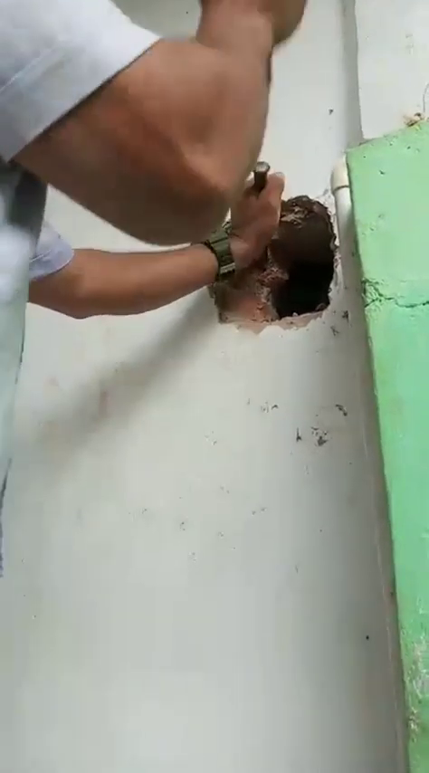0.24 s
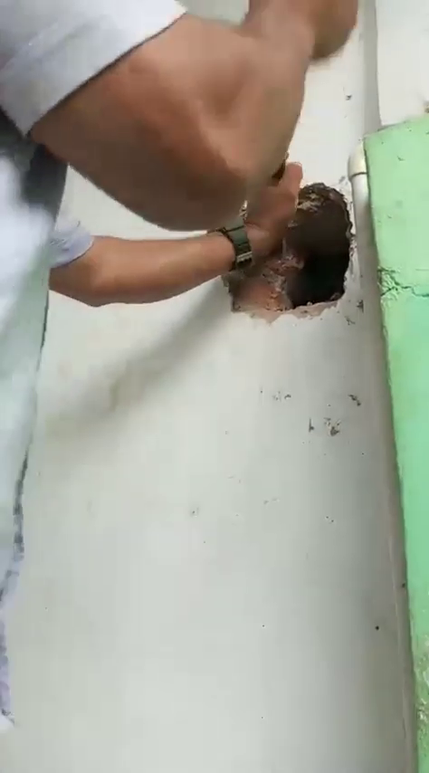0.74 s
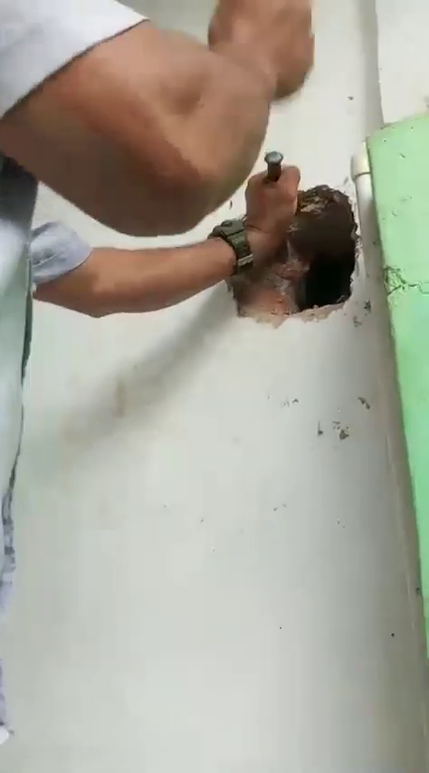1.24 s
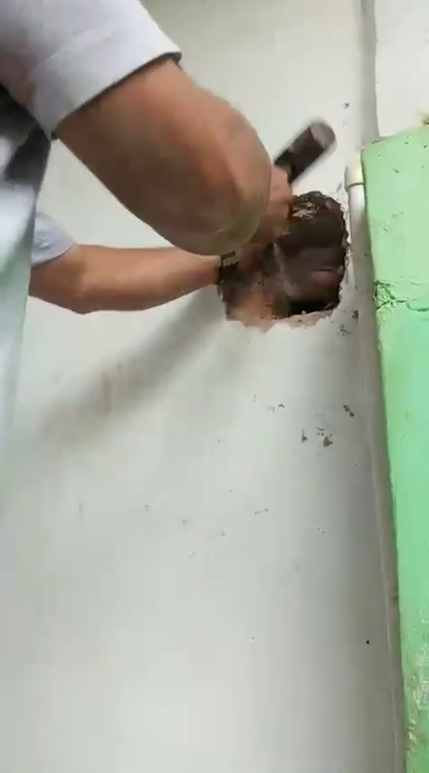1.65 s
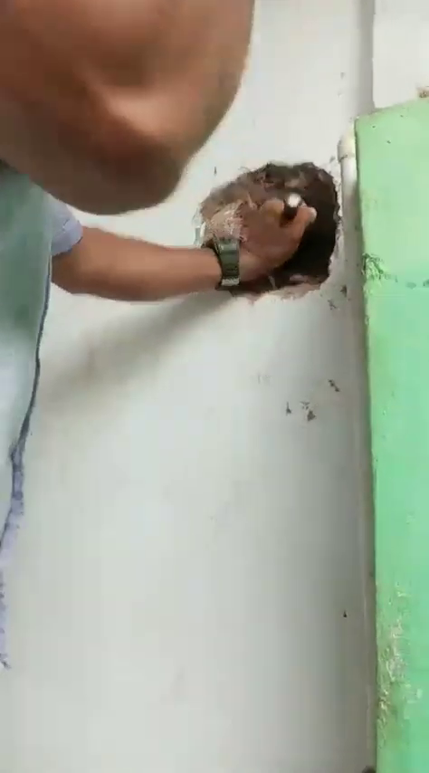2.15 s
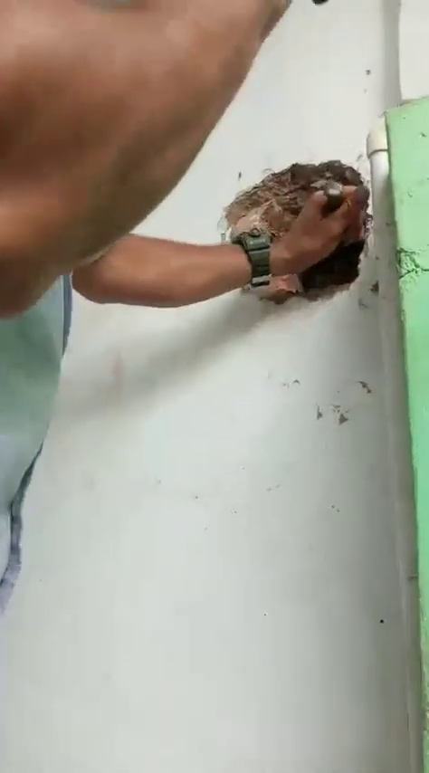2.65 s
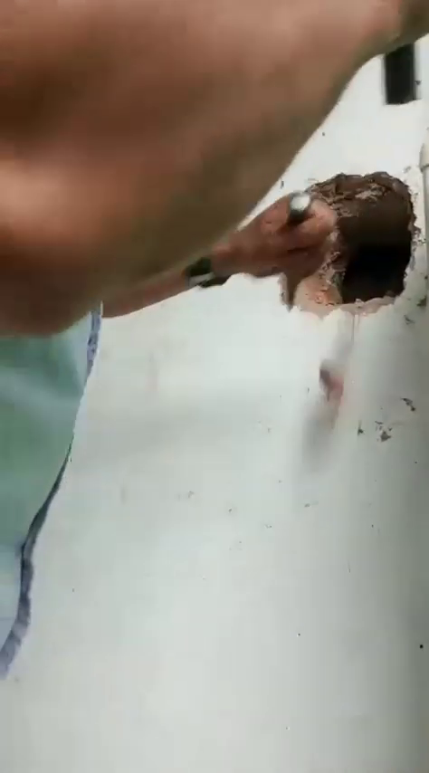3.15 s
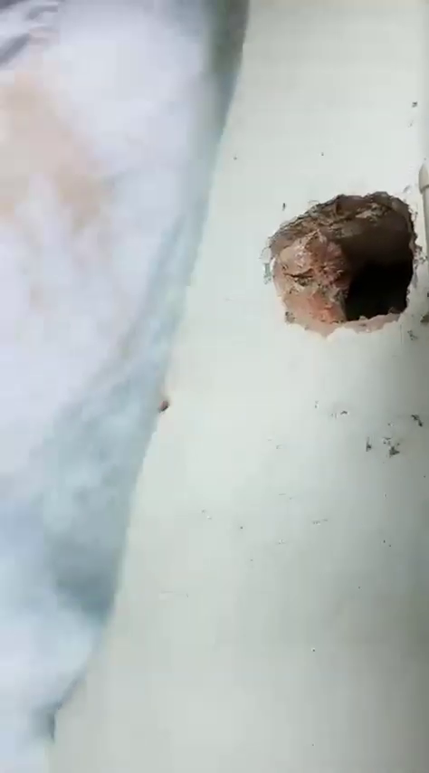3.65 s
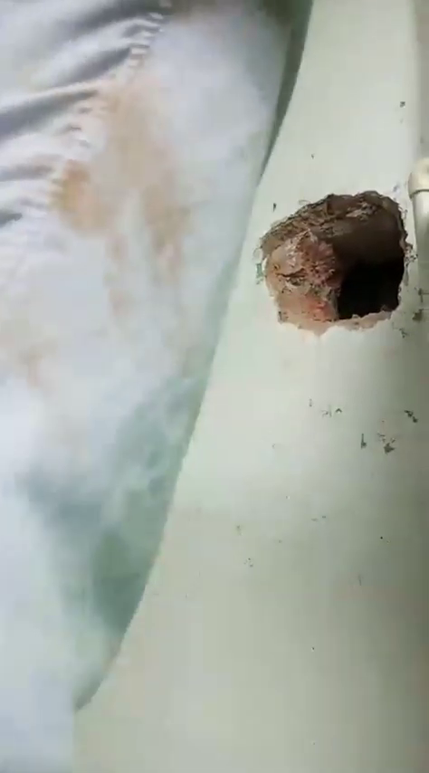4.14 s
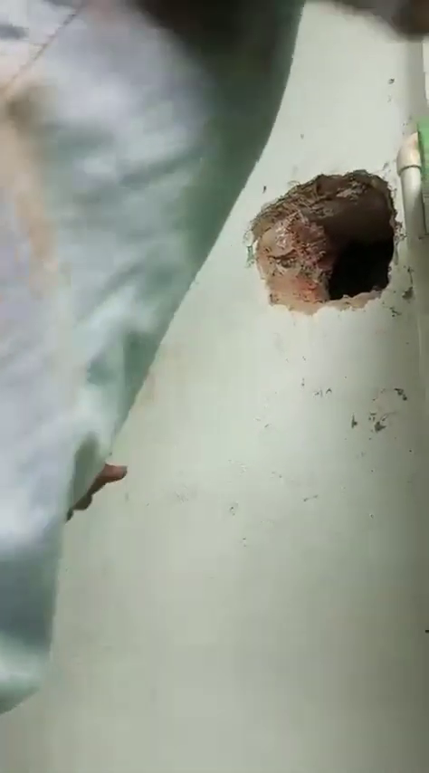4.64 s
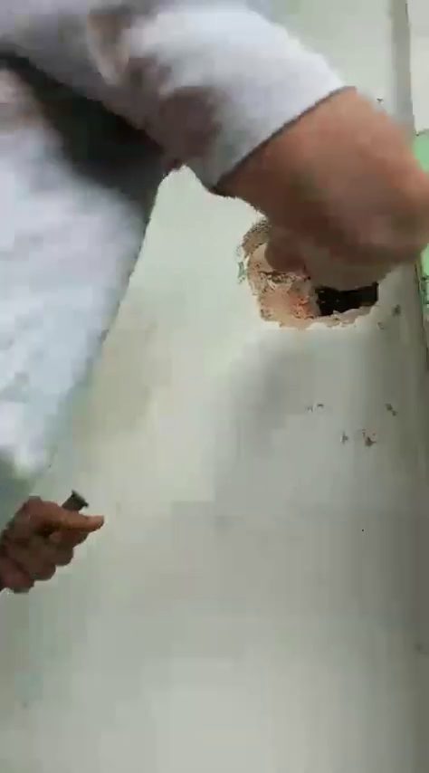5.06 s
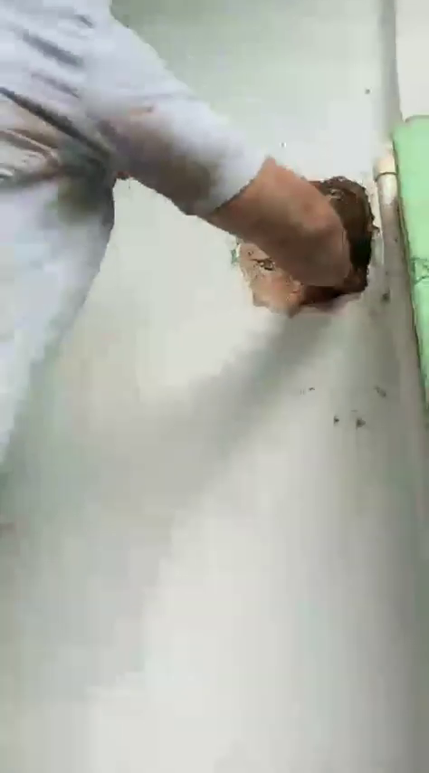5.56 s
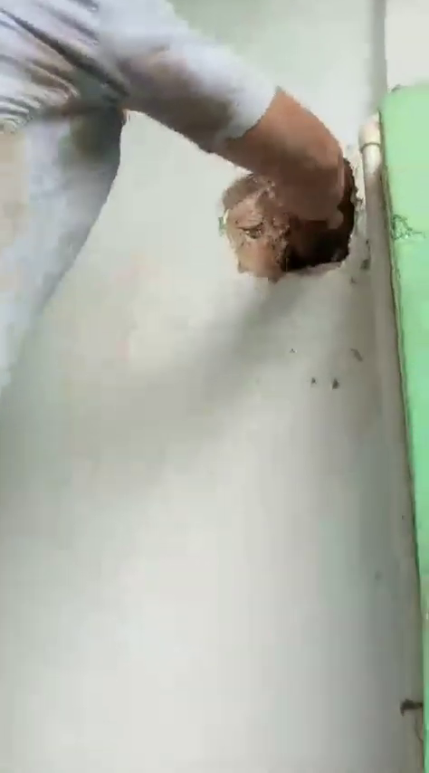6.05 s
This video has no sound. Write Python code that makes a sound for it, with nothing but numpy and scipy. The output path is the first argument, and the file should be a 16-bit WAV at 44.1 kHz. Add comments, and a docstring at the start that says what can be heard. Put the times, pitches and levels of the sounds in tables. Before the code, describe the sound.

Four hard hammer blows on a steel chisel crack into a brick wall, then chips patter, a shard clacks down, and faint scraping follows.

```python
"""A hammer drives a steel chisel into a plastered brick wall four times, in a small hard room: steel cracks, wall booms.
Resonant noise makes the crunch, falling chips, a larger shard and dull knocks; damped sines make the metal rings,
crumb pings and pottery-like ring. The loose chisel clinks; swelling crowds of slips make the scrapes of chisel and hand.
Behind lie a wavering low hum, rumble and flickering hiss. The recorder's limiter flattens each blow."""
import sys
import numpy as np
from scipy import signal
from scipy.fft import rfft, irfft, next_fast_len
from scipy.io import wavfile
from scipy.ndimage import uniform_filter1d, minimum_filter1d, map_coordinates

SR = 44100
rng = np.random.default_rng(int(sys.argv[2]) if len(sys.argv) > 2 else 0)


def persist_wave(psi):
    """Save psi, clipped to +-1, as 16-bit WAV."""
    counts = np.round(np.clip(psi, -1, 1) * 32767).astype(np.int16)
    wavfile.write(sys.argv[1], SR, np.atleast_2d(counts).T)


N = 278263
T = np.arange(int(.8 * SR)) / SR  # time within one event [s]

# hammer blows: (time [s], crack [dB], wall boom [dB], chisel zing [dB], relative brick crunch [dB], crunch centre [Hz])
BLOW_EVENTS = [(1.0182, -9, -10, -28, -9.5, 4740), (1.5268, -5.5, -6, -15.5, -11, 1000),
               (2.0279, -5.5, -5, -44, -7.5, 4300), (2.5418, -6.5, -13, -60.5, -5, 1690)]
# resonances of the chisel: (frequency [Hz], width [Hz])
CHISEL_MODES = [(2210, 120), (5480, 130), (10150, 880)]
# colour of dull contact with masonry: (frequency [Hz], relative level [dB])
THUD_COLOUR = [(59, -52), (100, -6), (252, -5.5), (367, -4), (646, -4), (849, -6), (1370, -8), (1590, -8.5),
               (2420, -7.5), (3390, -18), (4000, -15.5), (7200, -36), (15000, -43.5)]


def amp(db):
    """Decibels to gain."""
    return 10 ** (np.asarray(db) / 20)


def unit(x):
    """Scale to rms 1."""
    return x / np.sqrt(np.mean(x ** 2) + 1e-20)


def along(points, hz):
    """Interpolate (Hz, value) points on a log frequency axis."""
    f, v = np.transpose(points)
    return np.interp(np.log(hz + 1), np.log(f + 1), v)


def add(track, time_s, x):
    """Mix x into the track from time_s, cut at the track's end."""
    i = max(round(time_s * SR), 0)
    track[i:i + len(x)] += x[:max(N - i, 0)]


def filtered(x, gain):
    """Multiply the spectrum of x by a gain of frequency."""
    size = next_fast_len(len(x) + 8192)  # padding limits wrap-around
    return irfft(rfft(x, size) * gain(np.fft.rfftfreq(size, 1 / SR)), size)[:len(x)]


def shaped(points):
    """Gain function of a (Hz, dB) spectrum."""
    return lambda hz: amp(along(points, hz))


def hill(centre_hz, octaves, skirt_db):
    """A broad resonance of brick on a weak skirt that leans towards the bass."""
    # colour of gritty sounds: (frequency [Hz], relative level [dB])
    brick_colour = [(40, -30), (130, -24), (300, 0), (6000, -3.5), (7500, -8.5), (10000, -2.5),
                    (12500, -10), (15500, -5)]

    def gain(hz):
        away_octaves = np.log2((hz + 1) / centre_hz)
        peak = np.exp(-.5 * (away_octaves / octaves) ** 2)
        skirt = amp(skirt_db) / (1 + ((away_octaves + 0.68) / 3.08) ** 4)
        return shaped(brick_colour)(hz) * (peak + skirt)
    return gain


def lumpy(gain, spacing_hz, depth_db):
    """Random resonances on a colour: no two contacts or fragments are alike."""
    bumps = rng.standard_normal(2048)
    return lambda hz: gain(hz) * amp(depth_db * map_coordinates(bumps, [hz / spacing_hz], mode="mirror"))


def steel(centre_hz, width_hz):
    """One resonance of a struck tool, blurred by the grip and the brick."""
    return lambda hz: 1 / (1 + ((hz - centre_hz) / (width_hz / 2)) ** 2)


def noise(gain, size=len(T)):
    """Coloured noise of rms 1."""
    return unit(filtered(rng.standard_normal(size), gain))


def patchy(x, depth_db):
    """Let the level drift separately in patches of time and frequency; rms 1."""
    z = signal.stft(x, nperseg=512)[2]
    field = uniform_filter1d(rng.standard_normal(z.shape), size=7, axis=0)
    field = uniform_filter1d(field, size=14, axis=1)
    return unit(signal.istft(z * amp(depth_db * unit(field)), nperseg=512)[1][:len(x)])


def dying(x):
    """Each frequency fades at the room's own speed."""
    # room decay: (frequency [Hz], t60 [s])
    room_decay = [(150, 0.82), (700, 0.6), (3000, 0.36), (6000, 0.3), (14000, 0.35)]
    hz, t, z = signal.stft(x, SR, nperseg=256)
    fade = amp(-60 * t / along(room_decay, hz)[:, None])
    return signal.istft(z * fade, SR, nperseg=256)[1][:len(x)]


def in_room(x, wet_db):
    """The direct sound and a fresh tail of reflections."""
    tail = dying(rng.standard_normal(len(T))) * (1 - np.exp(-T / 0.00043))
    response = amp(wet_db) * tail / np.linalg.norm(tail)
    response[0] = 1
    return signal.fftconvolve(x, response)[:len(x)]


def burst(gain, t60_s):
    """A contact: coloured noise dying quickly, with the energy of a fade that starts at rms 1."""
    fade = amp(-60 * T / t60_s)
    x = noise(gain) * fade
    return x * np.linalg.norm(fade) / np.linalg.norm(x)


def contact_t60(full_force_s, db):
    """Hard contacts are over at once; soft ones crumble and drag on."""
    softer_db_per_doubling = 11
    return full_force_s * 2 ** (-db / softer_db_per_doubling)


def ringing(modes):
    """Damped modes, each a little different in pitch and strength at every contact."""
    out = 0
    for hz, db, t60_s in modes:
        level = amp(db + rng.normal(0, 1) - 60 * T / t60_s)
        out = out + level * np.sin(2 * np.pi * (hz + rng.normal(0, 3.2)) * T)
    return out


def chord(lines):
    """Steady sines of random phase and slightly random level; rms 1."""
    out = 0
    for hz, db in lines:
        level = amp(db + rng.normal(0, 2))
        out = out + level * np.sin(2 * np.pi * (hz * T + rng.random()))
    return unit(out)


def blows():
    """Steel on steel cracks and fills the room; the chisel crushes brick and shoves the wall, which booms in its modes."""
    # wall modes: (frequency [Hz], relative level [dB])
    wall_modes = [(156.1, -28.5), (236.9, -28), (344.5, -65), (430.7, -35), (516.8, -42.5), (753.7, -40),
                  (812.9, -39.5), (925.9, -53.5), (1270, -52)]
    # hammer and chisel ringing together: (frequency [Hz], relative level [dB])
    bar_modes = [(2116, -27), (2283, -35), (2487, -27.5), (2891, -33), (4517, -38.5), (5093, -45.5),
                 (5620, -70), (5685, -49), (5722, -62), (5873, -48)]
    # colour of the crack: (frequency [Hz], relative level [dB])
    crack_colour = [(530, -21), (900, -6.5), (1100, -10.5), (1200, -12), (1590, -11), (2120, -7),
                    (3260, -7), (4410, -2.5), (5820, -4.5), (7490, -21.5), (9200, -20.5), (10100, -16),
                    (11800, -22.5), (15100, -21), (16000, -16)]
    # colour of the boom: (frequency [Hz], relative level [dB])
    boom_colour = [(30, -42.5), (70, -16), (120, -12), (170, -2), (300, -5.5), (500, -8.5), (800, -11),
                   (1300, -21), (3000, -52.5)]
    out = np.zeros(N)
    for time_s, crack_db, boom_db, zing_db, crunch_db, crunch_hz in BLOW_EVENTS:
        colour = lumpy(shaped(crack_colour), spacing_hz=94.5, depth_db=2.5)
        # the top treble arrives mostly by reflection
        direct = burst(lambda hz: colour(hz) / (1 + (hz / 8000) ** 4), t60_s=0.037)
        reflected = dying(noise(colour))
        grip = np.array([1 + 0.01 * rng.standard_normal(), 1])  # each new grip detunes the steel a little
        bar_ring = chord(grip * bar_modes) * amp(-60 * T / 0.53)
        crack = amp(6) * direct + reflected + amp(-18.5) * bar_ring

        # the cracked bricks shake briefly, then only the room rings on
        shudder = amp(-18.5) / (1 + (T / 0.116) ** 4) + amp(-3.0)
        wall_ring = chord(wall_modes) * amp(-60 * T / .5)
        boom = amp(-1.5) * wall_ring + shudder * dying(noise(shaped(boom_colour)))
        swell = 1 - np.exp(-T / 0.0034)  # the heavy wall takes a moment to get going

        zing = dying(noise(steel(*CHISEL_MODES[2])))

        fractures = rng.standard_normal(len(T)) * (rng.random(len(T)) < 700 / SR)  # 700 per second
        crunch_colour = lumpy(hill(crunch_hz, octaves=0.8, skirt_db=-16), spacing_hz=200, depth_db=5)
        crunch = unit(filtered(fractures, crunch_colour))
        crunch = in_room(crunch * swell * amp(-60 * T / 0.2), wet_db=-8.5)

        blow = amp(crack_db) * crack + amp(boom_db) * boom * swell
        blow = blow + amp(zing_db) * zing + amp(crunch_db - 7.5) * crunch
        add(out, time_s, blow)
    return out


def chips():
    """Brittle bits of brick tick as they snap off and land, each in its own short resonances."""
    # chips and grit: (time [s], relative level [dB], centre [Hz])
    chip_hits = [(0.4955, -13, 2880), (0.792, -37.5, 2600), (0.8821, -31, 1850), (0.983, -26.5, 2160),
                 (1.396, -43, 10500), (1.971, -33.5, 10500), (2.486, -44, 12000), (2.7544, -21, 4350),
                 (2.8107, -26.5, 2396), (2.982, -40, 9000), (3.018, -3.5, 3900), (3.1153, -18.5, 4480),
                 (3.154, -26, 3440), (3.201, -20.5, 3550), (3.261, -26, 4600), (3.315, -32.5, 2970),
                 (3.384, -38.5, 3080), (3.808, -43.5, 11850), (4.0308, -41, 4300), (4.093, -32, 6760),
                 (4.3862, -21, 4900), (4.6285, -37, 9700), (4.703, -35, 10900), (4.8957, -38, 3220),
                 (5.029, -47.5, 9100), (5.083, -40.5, 5800), (5.122, -46.5, 13100), (5.525, -45, 3000),
                 (5.576, -47.5, 7000), (5.8073, -31.5, 3230), (6.025, -34, 7000)]
    out = np.zeros(N)
    for time_s, db, hz in chip_hits:
        colour = lumpy(hill(hz, octaves=0.66, skirt_db=-17), spacing_hz=140, depth_db=2)
        tick = burst(colour, contact_t60(0.0047, db))
        tick = tick * (1 - np.exp(-T / 0.00063))  # crumbly edges soften the first touch
        add(out, time_s, amp(db + 2.0) * in_room(tick, wet_db=-3))  # the hole is near the microphone
    return out


def shard():
    """A larger piece clacks on the floor, further off in the room, and rings like pottery."""
    # lands on one edge, then flat, and rocks: (time [s], level [dB])
    shard_hits = [(4.111, -2.5), (4.1181, -5), (4.133, -18)]
    # colour of the contact: (frequency [Hz], relative level [dB])
    clack_colour = [(180, -69), (300, -41), (835, -17), (1140, -16), (1260, -33), (2480, -2.5),
                    (5480, -12.5), (6460, -20.5), (7500, -32), (15500, -45.5)]
    # modes of hard-fired brick: (frequency [Hz], relative level [dB], t60 [s])
    shard_modes = [(2500, -0.5, 0.2), (2640, -5.5, 0.18), (2945, 0.5, 0.18), (4400, -10, 0.26),
                   (4570, -14, 0.21), (6400, -8.5, 0.19)]
    out = np.zeros(N)
    for time_s, db in shard_hits:
        clack = burst(lumpy(shaped(clack_colour), spacing_hz=150, depth_db=1.5), t60_s=0.0084)
        hit = in_room(clack, wet_db=1.5) + amp(-19) * ringing(shard_modes)
        add(out, time_s, amp(db) * hit)
    return filtered(out, lambda hz: hz ** 2 / (hz ** 2 + 450 ** 2))  # the clack carries little bass


def debris_flow():
    """Every blow or disturbance lets go a spill that swells quickly and runs dry."""
    # crumbs set loose by the chisel, the falling shard and the hand: (time [s], relative level [dB])
    other_spills = [(.72, -46.5), (3.12, -42), (4.15, -41), (5.7, -63)]
    blow_spill_db, rise_s, fall_s = -44, 0.11, 0.32
    power = np.zeros(N)
    for time_s, db in [(blow[0], blow_spill_db) for blow in BLOW_EVENTS] + other_spills:
        age_s = np.maximum(np.arange(N) / SR - time_s, 0)
        power += (amp(db) * (1 - np.exp(-age_s / rise_s)) * np.exp(-age_s / fall_s)) ** 2
    return np.sqrt(power)


def crumbs():
    """Sand and mortar trickle down the wall: tiny damped pings of scattered pitch and size over a hiss of dust."""
    out, t = np.zeros(N), T[:500]
    for when, pitch, size in rng.random((1500, 3)):
        hz = 1900 * 3.4 ** pitch
        envelope = np.exp(-t * hz / 3) - np.exp(-t * hz)
        add(out, when * N / SR, amp(28 * size) * np.sin(2 * np.pi * hz * t) * envelope)
    trickle = unit(in_room(out, wet_db=-2))
    dust = noise(hill(2500, octaves=0.87, skirt_db=-24.5), size=N)
    return debris_flow() * (trickle + amp(4) * dust)


def knocks():
    """Tools and hand bump brick and floor dully; the hammer head rings as it settles on the floor."""
    # knocks: (time [s], level [dB])
    knock_hits = [(.021, -31.5), (.12, -35), (0.2206, -27), (4.2947, -12), (4.2999, -16.5), (4.4209, -16.5),
                  (4.4258, -12), (4.471, -20.5), (5.137, -40), (6.051, -36.5)]
    # modes of a knock: (frequency [Hz], relative level [dB], t60 [s])
    slab_modes = [(253.6, 0, 0.41), (471.7, 0.5, 0.41), (641, 11, 0.098), (994, -4.5, 0.15),
                  (1160, 3, 0.37), (1379, 17, 0.037), (1570, -26, 0.21)]
    # the hammer head tips onto the floor: (time [s], level [dB])
    head_hits = [(4.472, -38), (4.499, -32)]
    # modes of the hammer head: (frequency [Hz], relative level [dB], t60 [s])
    head_modes = [(1744, 6.5, 0.19), (2260, 14.5, 0.046), (3000, -4.5, 0.26), (3980, -1.5, 0.32),
                  (4940, -4, 0.081)]
    out = np.zeros(N)
    for time_s, db in knock_hits:
        contact = burst(shaped(THUD_COLOUR), contact_t60(0.024, db))
        bump = in_room(contact, wet_db=-6.0) + amp(-17.5) * ringing(slab_modes)
        add(out, time_s, amp(db) * bump)
    for time_s, db in head_hits:
        add(out, time_s, amp(db) * ringing(head_modes))
    return filtered(out, lambda hz: hz ** 2 / (hz ** 2 + 90 ** 2))  # small things radiate little bass


def clinks():
    """The loose chisel, held in a fist, rings briefly in its two lowest modes."""
    # clinks: (time [s], level [dB], upper mode relative to lower [dB])
    clink_hits = [(.0203, -28.5, 2), (.1236, -41.5, 6.5), (.162, -40.5, 6), (.222, -45, 11), (.33, -56, 13),
                  (.3716, -37.5, 10.5), (.9132, -46.5, 13), (.96, -45.5, 9.5), (2.708, -32.5, 3),
                  (3.26, -35, -6), (3.288, -33, 1), (3.314, -47, 12), (3.5144, -30, -12),
                  (3.5463, -32, -1.5)]
    out = np.zeros(N)
    for time_s, db, upper_db in clink_hits:
        lower = burst(steel(*CHISEL_MODES[0]), t60_s=0.14)
        upper = burst(steel(*CHISEL_MODES[1]), t60_s=0.033)
        ring = (lower + amp(upper_db) * upper) * (1 - np.exp(-T / 0.00029))
        add(out, time_s, amp(db) * in_room(ring, wet_db=-5.5))
    return out


def scrapes():
    """Chisel and fingers drag over grit: a crowd of tiny slips swells and fades."""
    # scrapes over broken brick: (peak time [s], fall time constant [s], level [dB], centre [Hz])
    scrape_strokes = [(.035, 0.052, -33.5, 2200), (.488, .035, -23, 1800), (.491, .012, -13.5, 2300),
                      (.65, 0.033, -36.5, 1730), (1.941, 0.12, -38.5, 2820), (2.8, 0.044, -37, 3220),
                      (3.005, .05, -33, 2530), (3.16, .05, -41, 4220), (3.521, .08, -42, 2600),
                      (4.682, .023, -30.5, 1850), (5.14, 0.041, -40.5, 3500), (5.203, .033, -39, 2290),
                      (5.735, .05, -45.5, 3970), (5.815, 0.035, -39.5, 2050), (6.0, 0.029, -35, 1870),
                      (6.06, .03, -36.5, 610), (6.069, 0.033, -40.5, 3240), (6.135, 0.02, -42.5, 5250),
                      (6.196, 0.032, -36.5, 3930)]
    out = np.zeros(N)
    for peak_s, fall_s, db, hz in scrape_strokes:
        rise_s = .55 * fall_s
        octaves = 0.72 * (2000 / hz) ** 0.4  # finer grit rings higher and narrower
        start_s = max(peak_s - 4 * rise_s, 0)
        t = T + start_s - peak_s
        slips = rng.standard_normal(len(T)) * (rng.random(len(T)) < 4000 / SR)  # 4000 per second
        colour = lumpy(hill(hz, octaves, skirt_db=-13), spacing_hz=160, depth_db=3)
        grit = patchy(filtered(slips, colour), depth_db=1.5)
        rub = amp(-14) * unit(filtered(slips, shaped(THUD_COLOUR)))  # dull rub of the brick under the grit
        stroke = np.exp(np.minimum(t / rise_s, -t / fall_s))
        add(out, start_s, amp(db) * in_room((grit + rub) * stroke, wet_db=-13.5))
    return out


def hum():
    """A low hum, like a far motor through the walls, drifts in pitch and comes and goes."""
    # stretches at full level: (start [s], end [s], frequency [Hz], sine peak level [dB])
    hum_stretches = [(0.705, 0.897, 183, -44.5), (3.325, 4.087, 163, -45), (3.54, 4.95, 141, -48.5),
                     (5.113, 5.93, 145.5, -35.5)]
    fade_s, drift_rms_hz = .06, 0.79
    t, out = np.arange(N) / SR, np.zeros(N)
    waver = 1 + 0.038 * noise(lambda f: 1 / (1 + (f / 12) ** 4), size=N)
    drift_hz = drift_rms_hz * noise(lambda f: 1 / (1 + (f / 3) ** 4), size=N)
    for start_s, end_s, hz, db in hum_stretches:
        present = np.clip(np.minimum(t - start_s, end_s - t) / fade_s + 1, 0, 1)
        out += present * amp(db) * np.sin(2 * np.pi * np.cumsum(hz + drift_hz) / SR)
    return waver * out


def air():
    """A low rumble of steady noise and a faint, flickering hiss, until both die away at the end."""
    # colour of the rumble: (frequency [Hz], relative level [dB])
    rumble_colour = [(20, -29.5), (76, -22), (150, -5), (260, -22), (400, -39), (1200, -67), (3000, -79)]
    # colour of the hiss: (frequency [Hz], relative level [dB])
    hiss_colour = [(300, -13), (1400, -18), (2100, 6), (3000, -0.5), (4800, -12), (7200, -19.5),
                   (10000, -8.5), (13000, -17.5), (15800, -6.5)]
    fade_start_s, fade_db_per_s = 5.94, 50.5
    fade = amp(-fade_db_per_s * np.maximum(np.arange(N) / SR - fade_start_s, 0))
    rumble = amp(-47) * noise(shaped(rumble_colour), size=N)
    hiss = amp(-50.5) * patchy(noise(shaped(hiss_colour), size=N), depth_db=7.5)
    return fade * (rumble + hiss)


def scene():
    """Everything at one microphone."""
    tools_and_debris = blows() + chips() + shard() + crumbs() + knocks() + clinks() + scrapes()
    return (tools_and_debris + hum() + air())[None]


def limited(x, ceiling_db, release_db_per_s):
    """The gain drops within a few milliseconds of a loud sound and climbs back steadily, lifting the room's tail."""
    power = signal.lfilter(np.ones(128) / 128, 1, x ** 2)
    over_db = np.maximum(10 * np.log10(np.abs(power) + 1e-12) - ceiling_db, 0)
    climb_db = release_db_per_s * np.arange(N) / SR
    cut_db = np.maximum.accumulate(over_db + climb_db) - climb_db
    return x * amp(-uniform_filter1d(cut_db, size=64))


def peak_held(x):
    """A very fast look-ahead gain keeps the peaks within full scale."""
    needed_gain = 1 / np.maximum(np.abs(x), 1)
    return x * uniform_filter1d(minimum_filter1d(needed_gain, size=41), size=41)


def suppressed(x, threshold_db, depth_db):
    """Noise suppression: wherever a band falls near silence it is turned down further."""
    z = signal.stft(x, nperseg=256)[2]
    power = uniform_filter1d(np.abs(z) ** 2, size=9, axis=0)
    power = np.abs(uniform_filter1d(power, size=5, axis=1))
    quiet = 1 / (1 + (power / amp(threshold_db) ** 2) ** 2)
    return signal.istft(z * amp(-depth_db * quiet), nperseg=256)[1][:N]


def record(dry):
    """Limiter, noise suppression and band limit of a phone."""
    top_hz = 15900
    x = peak_held(limited(dry[0], ceiling_db=-9, release_db_per_s=145.5))
    x = suppressed(x, threshold_db=-77, depth_db=6.5)
    return filtered(x, lambda hz: (hz < top_hz) * hz / np.hypot(hz, 20))[None]


dry = scene()
out = record(dry)
persist_wave(out)
```